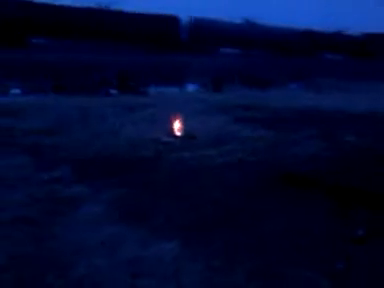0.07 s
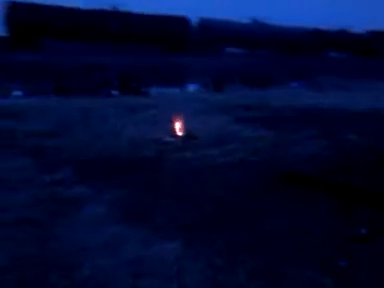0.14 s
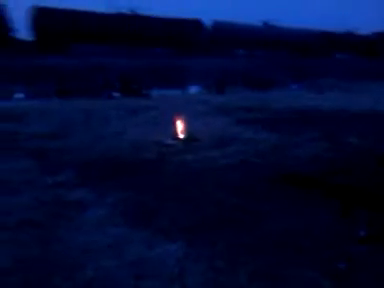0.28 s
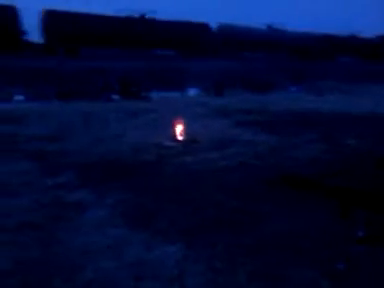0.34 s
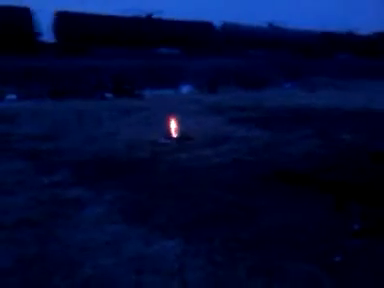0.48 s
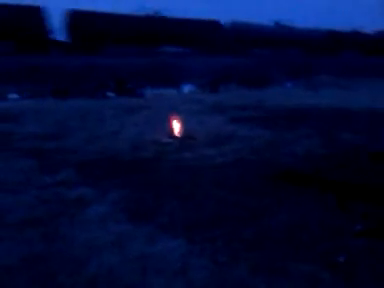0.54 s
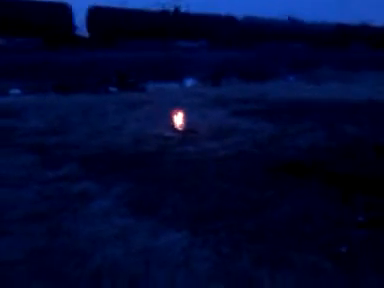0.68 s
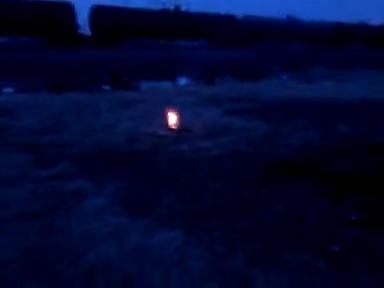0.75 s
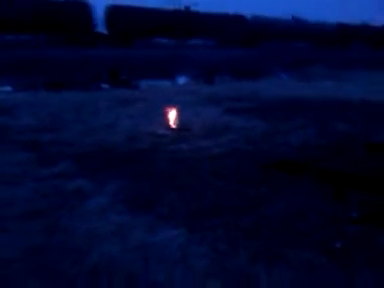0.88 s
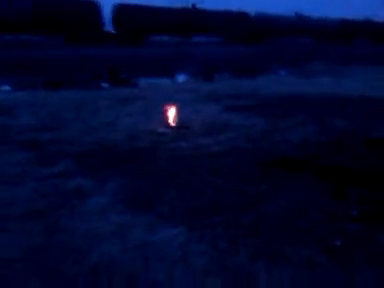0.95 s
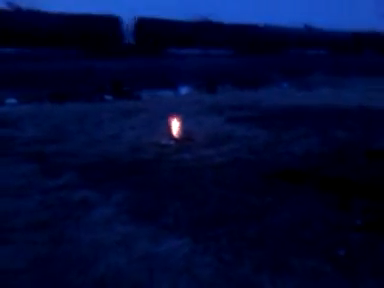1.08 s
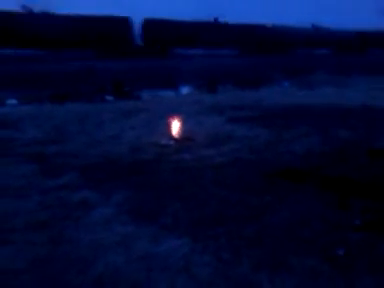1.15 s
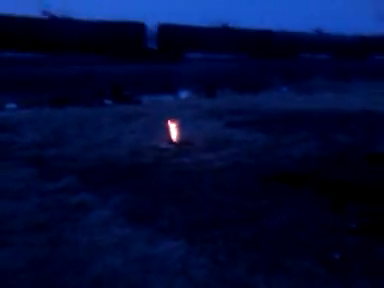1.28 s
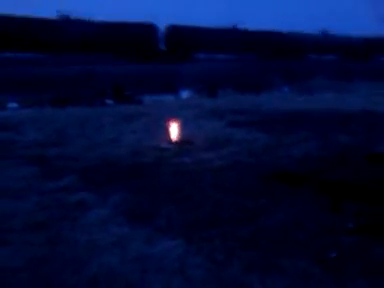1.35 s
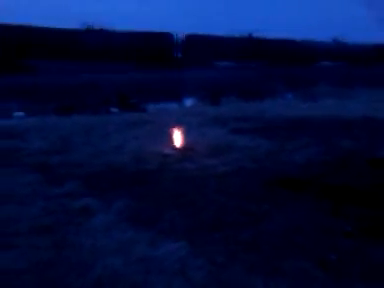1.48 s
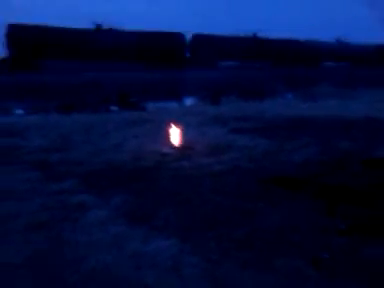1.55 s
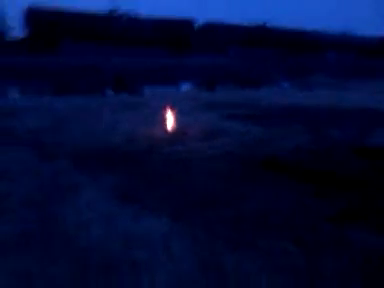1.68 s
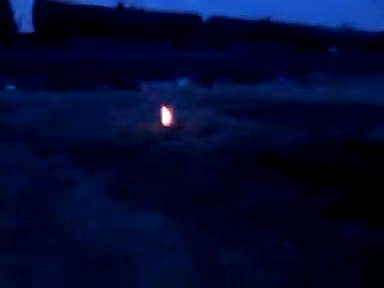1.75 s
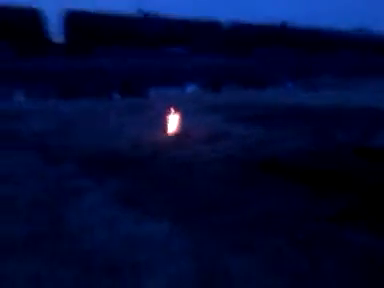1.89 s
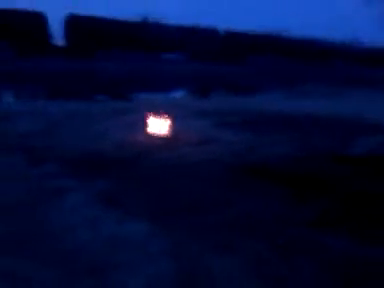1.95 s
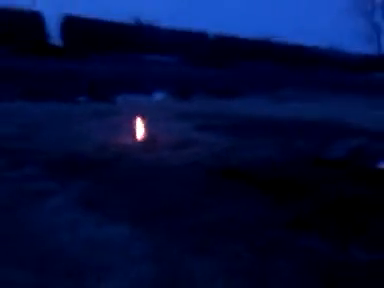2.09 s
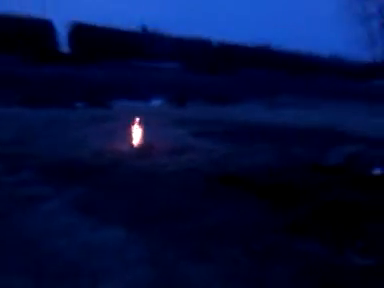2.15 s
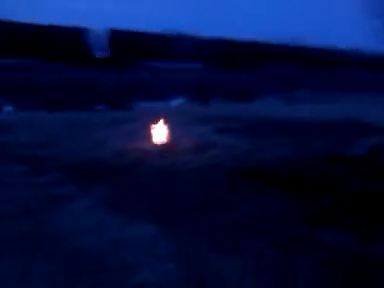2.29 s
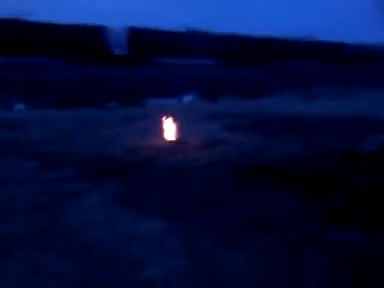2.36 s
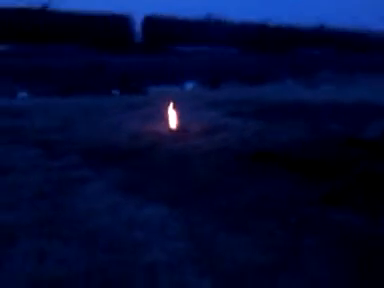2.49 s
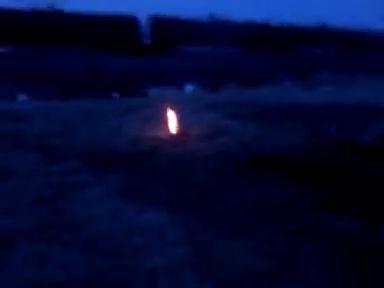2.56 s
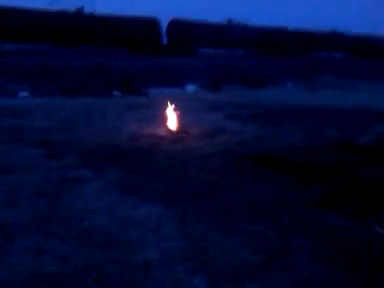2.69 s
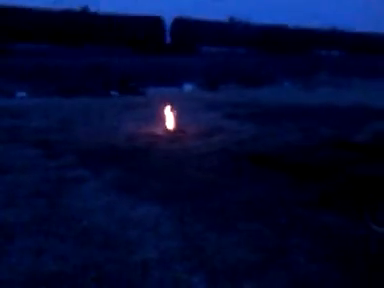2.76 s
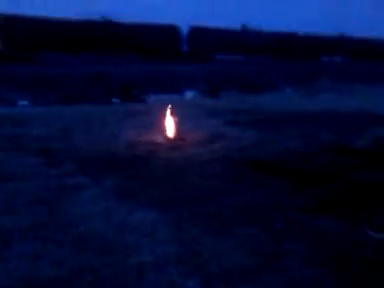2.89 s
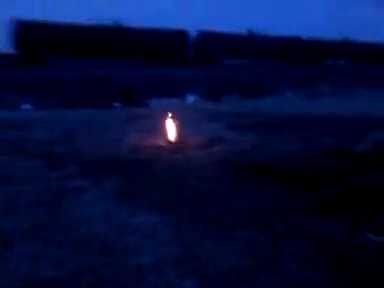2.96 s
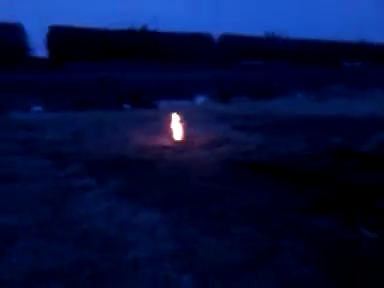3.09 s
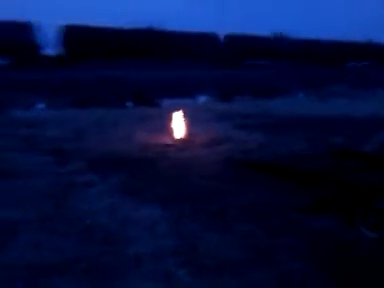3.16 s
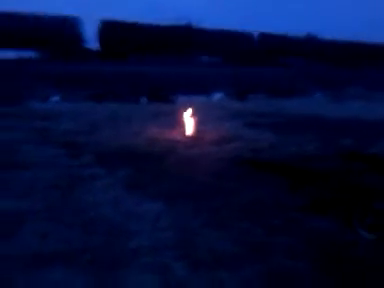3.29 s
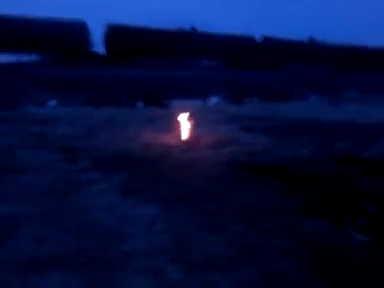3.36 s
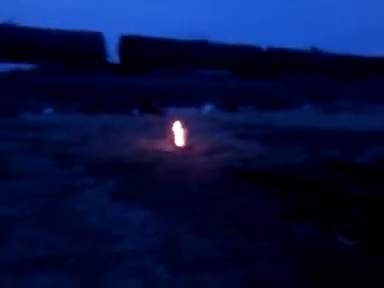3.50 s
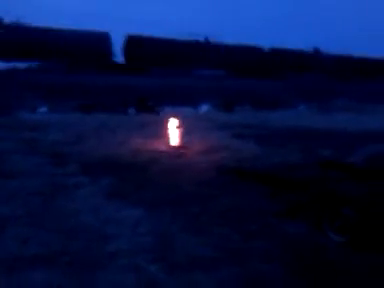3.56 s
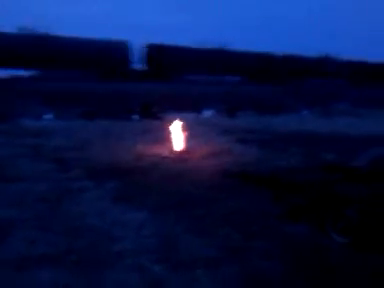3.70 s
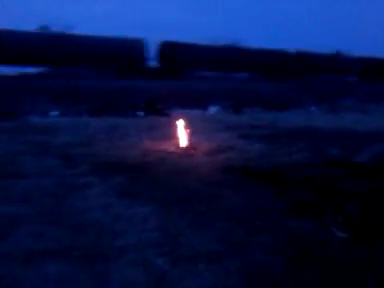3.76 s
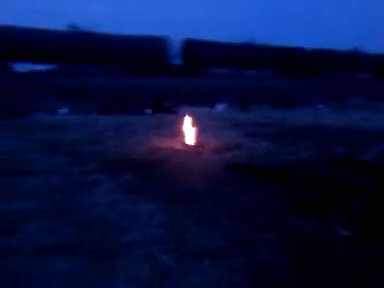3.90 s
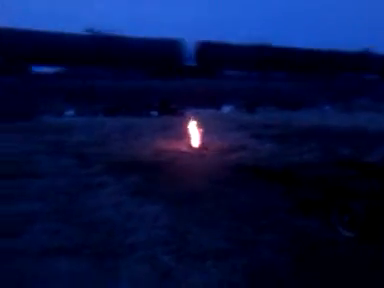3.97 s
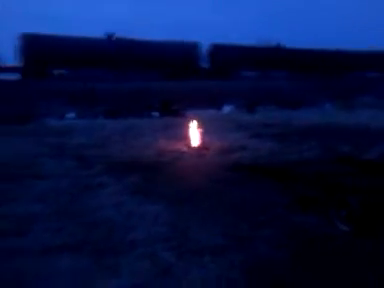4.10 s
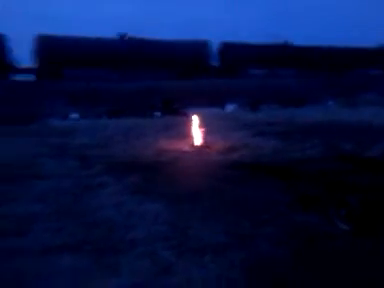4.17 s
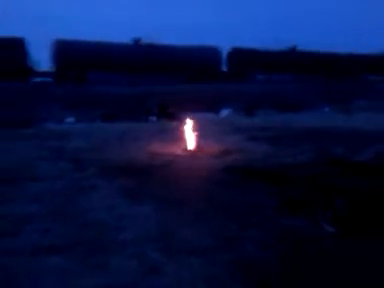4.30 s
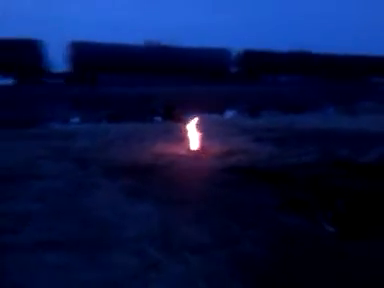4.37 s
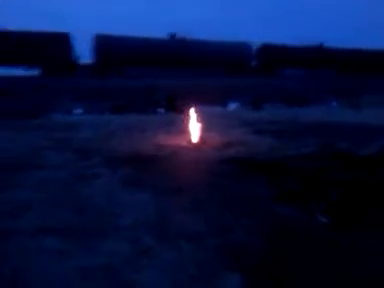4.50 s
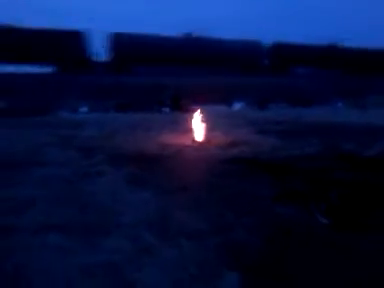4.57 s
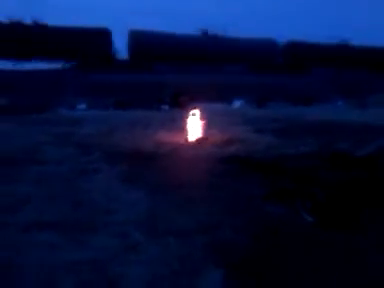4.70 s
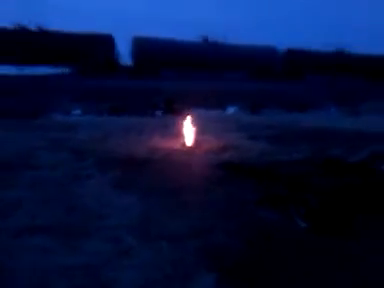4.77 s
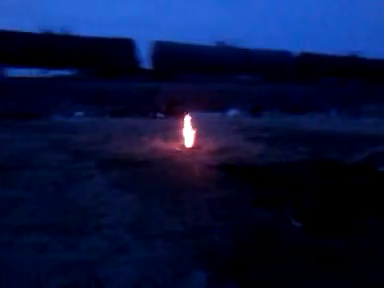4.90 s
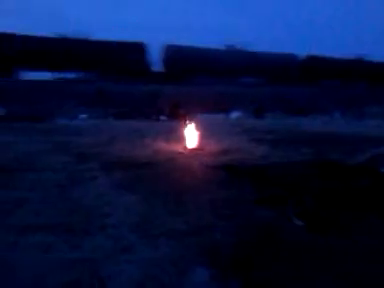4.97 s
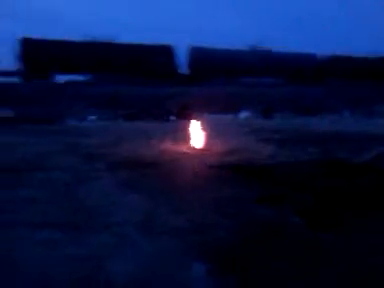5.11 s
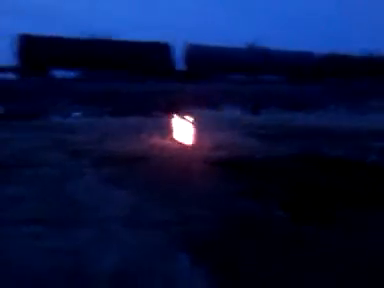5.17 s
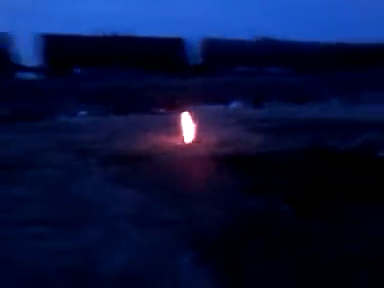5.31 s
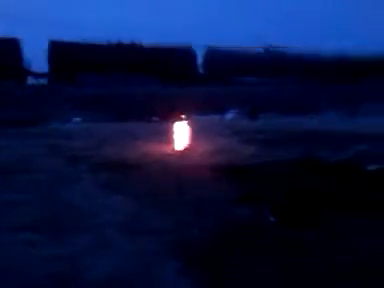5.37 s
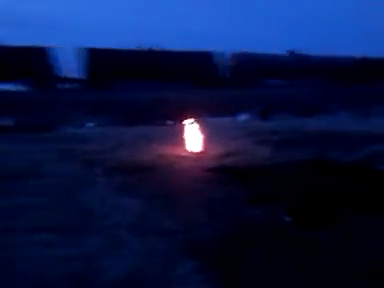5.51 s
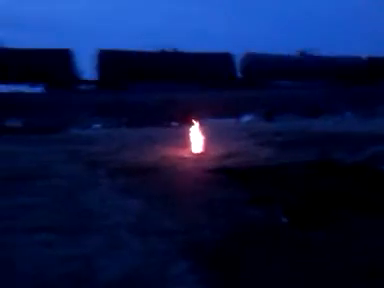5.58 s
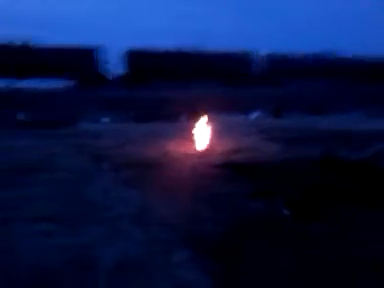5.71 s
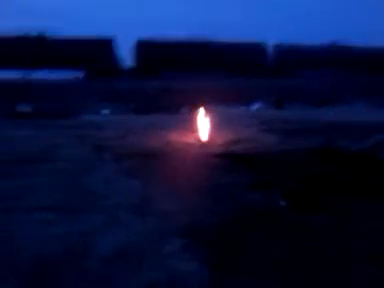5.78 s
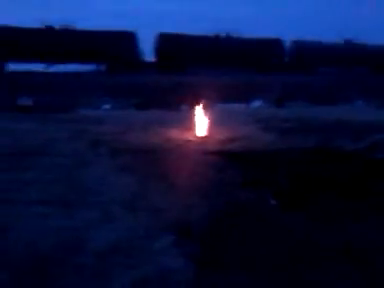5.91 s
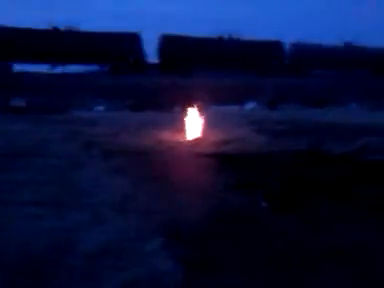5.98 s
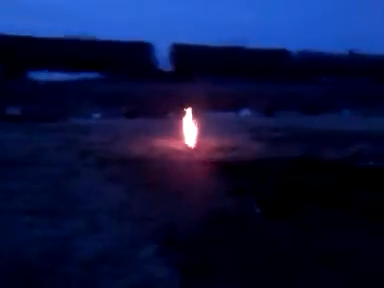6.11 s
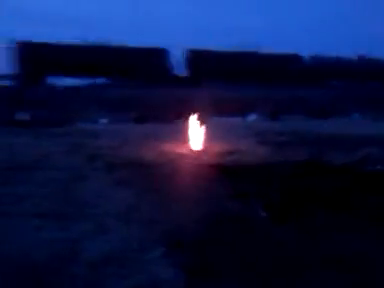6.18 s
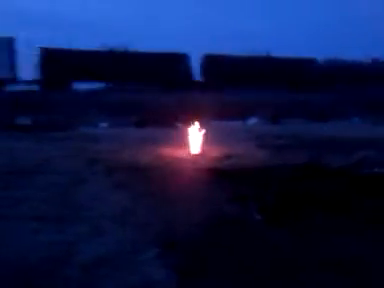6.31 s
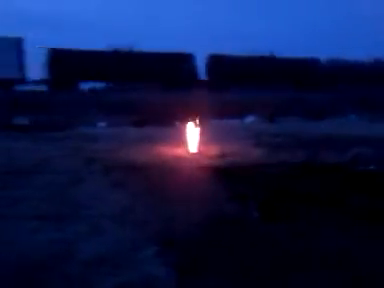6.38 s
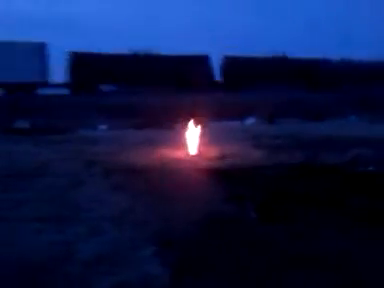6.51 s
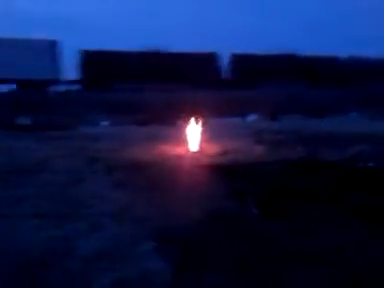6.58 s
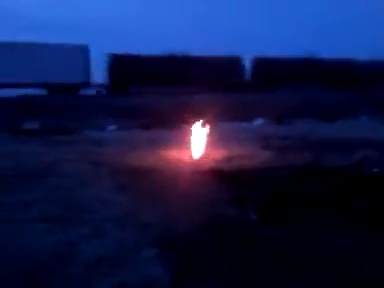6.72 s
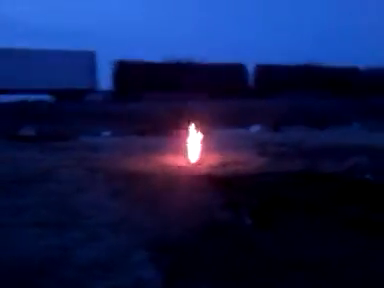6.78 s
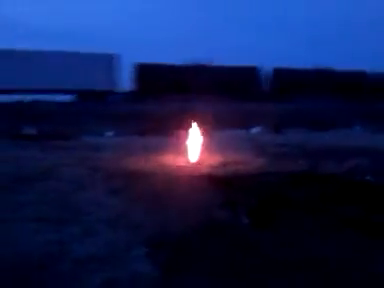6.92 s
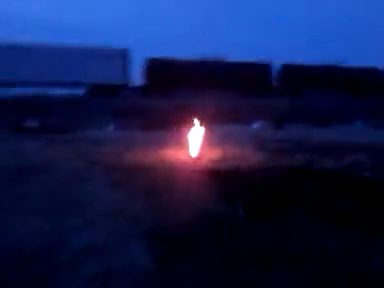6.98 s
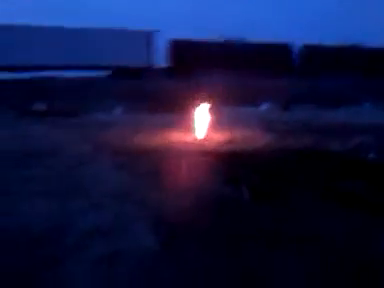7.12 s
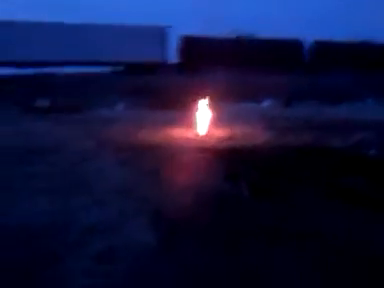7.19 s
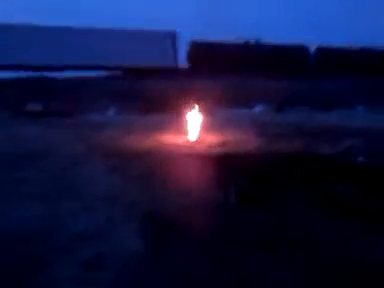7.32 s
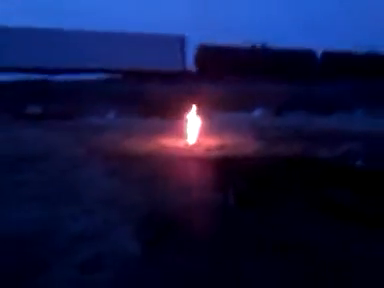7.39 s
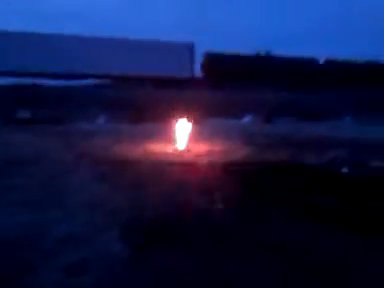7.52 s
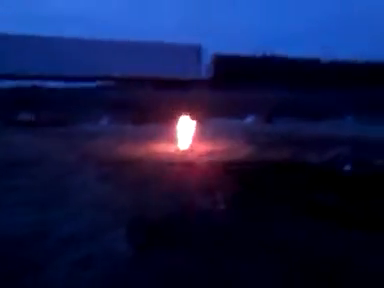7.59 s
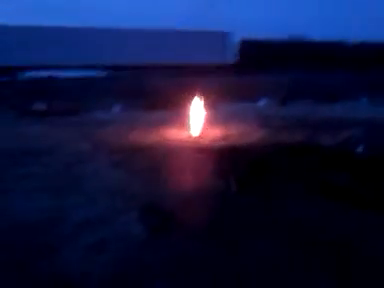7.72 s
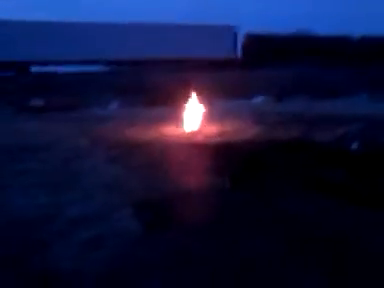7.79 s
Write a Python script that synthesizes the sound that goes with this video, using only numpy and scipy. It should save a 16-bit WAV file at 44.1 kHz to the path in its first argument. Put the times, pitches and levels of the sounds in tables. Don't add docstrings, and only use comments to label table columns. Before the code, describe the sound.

After a brief silence the sound opens abruptly on a freight train passing outdoors. Low car-body boom and a broad rolling roar run continuously, with a flat wheel banging about four times a second. The bangs blur into the distance as the rumble grows. Wheels sing in short metallic swells, a faint bearing whine joins later, and small overload clicks appear. A narrow-band phone microphone across a field makes it boxy.

```python
import sys
import numpy as np
from scipy import signal
from scipy.fft import rfft, irfft, next_fast_len
from scipy.io import wavfile
from scipy.ndimage import uniform_filter1d, minimum_filter1d, map_coordinates

SR = 44100
rng = np.random.default_rng(int(sys.argv[2]) if len(sys.argv) > 2 else 0)


def to_wav(sig):
    pcm = np.clip(np.atleast_2d(sig), -1, 1) * 32767
    pcm = np.round(pcm).astype(np.int16)
    wavfile.write(sys.argv[1], SR, pcm.T)


def volts(x):
    e = np.asarray(x, float) / 20
    return 10 ** e


N = 346185


def unit(x):
    return x / np.sqrt(np.mean(x ** 2) + 1e-20)


def along(points, hz):
    f, level_db = np.transpose(points)
    return volts(np.interp(np.log(hz + 1), np.log(f + 1), level_db))


def curves(rows):
    s, *columns = np.transpose(rows)
    return [np.interp(np.arange(N) / SR, s, column) for column in columns]


def swells(rows, half_s):
    t = np.arange(N) / SR
    return sum(np.outer(size, np.exp(-((t - s) / half_s) ** 2)) for s, *size in rows)


def wobble(rate):
    return map_coordinates(rng.standard_normal(N // 20), [np.arange(N) * rate / SR])


def filtered(x, response):
    m = next_fast_len(len(x) + 8192)
    return irfft(rfft(x, m) * response(np.fft.rfftfreq(m, 1 / SR)), m)[:len(x)]


def resonance(hz, width_hz):
    return lambda f: 1j * f * width_hz / (hz * hz - f * f + 1j * f * width_hz)


def narrow(hz, width_hz):
    drift = [unit(filtered(v, lambda f: 1 / (1 + (2 * f / width_hz) ** 2)))
             for v in rng.standard_normal((2, N))]
    phase = 2 * np.pi * np.cumsum(hz * np.ones(N)) / SR
    return unit(drift[0] * np.cos(phase) + drift[1] * np.sin(phase))


def rush(spectrum, patchy_db, grain_db, rate):
    contacts = rng.standard_normal(N) * volts(grain_db * np.minimum(wobble(rate), 2.3))
    z = signal.stft(contacts, nperseg=1024)[2]
    field = uniform_filter1d(rng.standard_normal(z.shape), 6, axis=0)
    field = uniform_filter1d(field, 4, axis=1)
    x = signal.istft(z * volts(patchy_db * unit(field)), nperseg=1024)[1][:N]
    return unit(filtered(x, lambda hz: along(spectrum, hz)))


# (t/s, rolling speed and nearness level/dB, axle load level/dB)
TRAIN = [(.6, -23, -25), (1.1, -22.5, -25), (1.6, -23.5, -26), (2.1, -22.5, -22.5), (2.6, -23.5, -27),
         (3, -21.5, -26), (3.5, -20, -23.5), (4.1, -20.5, -24), (4.7, -20, -23), (5.3, -18, -22),
         (5.7, -18.5, -19), (6.2, -17.5, -22), (6.55, -18, -25), (6.9, -18, -19), (7.2, -18, -19.5),
         (7.5, -21, -16), (7.85, -16.5, -18)]


def train():
    roll_db, load_db = curves(TRAIN)
    return roll_db, load_db


def follow(part, control_db):
    reference_db = -21
    return part[0] + part[1] * (control_db - reference_db)


# (f/Hz, level/dB per Hz)
BODY_SPECTRUM = [(15, -58), (25, -30), (74, -0.5), (91, 2.5), (130, -9), (170, -34), (290, -120)]
# (f/Hz, level/dB per Hz)
BOGIE_SPECTRUM = [(71, -29), (120, 0.5), (189, 0.5), (253, -7), (400, -12.5), (520, -39), (880, -120)]
# (t/s, car body swell level/dB, bogie swell level/dB)
LURCH = [(.93, 12, -2), (1.2, 6, 0), (1.35, -8, 5), (1.53, 3, 0), (1.78, -1, 7.5), (2.04, 9, 0),
         (2.36, 8.5, 3), (2.78, 6.5, -0.5), (3.15, 7, -0.5), (3.4, 2.5, 1), (3.62, 3.5, 1.5),
         (3.82, 6, -2.5), (3.92, -3, -3), (4.2, -12, 3), (4.75, 1.5, 2), (5.1, 4, -2), (5.3, -11, 0.5),
         (5.55, 6, 4), (5.65, -6.5, -5), (6.05, 2.5, 0), (6.16, -4, 3.5), (6.28, 9, 3.5), (6.37, -7.5, 4.5),
         (6.86, 8, 0.5), (7.1, 2, 1.5), (7.19, -6, -0.5), (7.32, 4, 5), (7.51, -3, 4.5), (7.64, -10, 1),
         (7.79, 3.5, 4.5)]
LURCH_S = .04
BODY_PART, BOGIE_PART = (-25, .9), (-24.5, 0.9)


def rumble():
    load_db = train()[1]
    body_swell_db, bogie_swell_db = swells(LURCH, LURCH_S)
    body_db = follow(BODY_PART, load_db) + body_swell_db + .8 * wobble(11)
    bogie_db = follow(BOGIE_PART, load_db) + bogie_swell_db + 0.7 * wobble(18)
    body = volts(body_db) * rush(BODY_SPECTRUM, patchy_db=0.5, grain_db=2.0, rate=100)
    bogie = volts(bogie_db) * rush(BOGIE_SPECTRUM, patchy_db=1.8, grain_db=1.5, rate=200)
    return body + bogie


# (f/Hz, level/dB per Hz)
RAIL_SPECTRUM = [(150, -21), (250, -8.5), (408, -3.5), (584, 1.5), (792, -3.5), (1100, -9.5), (1430, -31),
                 (2420, -120)]
# (f/Hz, level/dB per Hz)
SIDE_SPECTRUM = [(530, -29.5), (900, -3), (1270, 0), (1520, -1.5), (1800, -1.5), (2340, -17.5),
                 (3960, -120)]
# (f/Hz, level/dB per Hz)
WHEEL_SPECTRUM = [(940, -31.5), (1600, -4), (2060, -2.5), (2500, -1), (2920, -4), (3330, -6), (3600, -15),
                  (4680, -51), (7920, -120)]
# (f/Hz, level/dB per Hz)
EDGE_SPECTRUM = [(2060, -28), (3500, -0.5), (4120, -14), (4370, -24.5), (4570, -42.5), (5940, -69),
                 (10100, -120)]
RAIL_PART, SIDE_PART, WHEEL_PART = (-26.5, 0.7), (-28.5, 1.1), (-24, 0.51)


def rolling():
    roll_db = train()[0]
    jolt = wobble(9)
    wheel_base_db = follow(WHEEL_PART, roll_db)
    rail_db = follow(RAIL_PART, roll_db) + 0.46 * jolt + .9 * wobble(19)
    side_db = follow(SIDE_PART, roll_db) + 0.29 * jolt + 0.16 * wobble(12)
    wheel_db = wheel_base_db - 0.5 + 0.14 * jolt + 0.14 * wobble(18)
    edge_db = wheel_base_db - 17 + .6 * wobble(30)
    rail = volts(rail_db) * rush(RAIL_SPECTRUM, patchy_db=1.02, grain_db=1.0, rate=300)
    sides = volts(side_db) * rush(SIDE_SPECTRUM, patchy_db=1.5, grain_db=2.0, rate=300)
    wheels = volts(wheel_db) * rush(WHEEL_SPECTRUM, patchy_db=2.3, grain_db=1.5, rate=300)
    edge = volts(edge_db) * rush(EDGE_SPECTRUM, patchy_db=.8, grain_db=6.3, rate=650)
    return rail + shake() * (sides + wheels) + edge


BLUR_FROM_S, BLUR_S_PER_S, BLUR_MAX_S = 2.0, .05, 0.016


def smear(s):
    return np.clip((s - BLUR_FROM_S) * BLUR_S_PER_S / BLUR_MAX_S, 0, 1)


# (t/s, peak level/dB, ring f/Hz, thud level/dB)
FLAT = [(0.63, -12, 695, 4), (0.677, -11.5, 710, 5), (0.855, -6.5, 662, -14), (1.078, -8, 712, -10),
        (1.301, -5, 720, -6), (1.526, -6.5, 667, -2.5), (1.756, -4.5, 593, -6), (1.978, -9, 540, 2.5),
        (2.2, -9, 610, -4), (2.45, -7, 633, -16), (2.67, -7, 610, -15), (2.895, -9, 636, -9),
        (3.16, -10, 520, -8.5), (3.368, -19, 547, -4.5), (3.597, -19, 643, 3), (3.824, -8.5, 585, -9),
        (4.04, -9, 560, -8), (4.273, -9.5, 542, -10.5), (4.5, -10.5, 560, -12), (4.958, -18, 550, -8),
        (5.274, -10.5, 614, -14), (5.485, -11, 568, 2), (5.69, -7, 565, -9.5), (5.9, -9.5, 593, -7.5),
        (6.88, -11, 740, -7.5), (6.99, -6.5, 684, -10), (7.246, -11.5, 452, -7), (7.794, -9, 525, -3.5)]
BANG_T60_S, CLANK_DB = .2, -9
SMEAR_T60_S, SMEAR_DB = 0.047, 3
RING_WIDTH_HZ, SMEARED_WIDTH_HZ = 410, 300


def flat_spot():
    out, t = np.zeros(N + SR), np.arange(SR // 2) / SR
    thud_mode, clank_mode = resonance(170, 150), resonance(1500, 1200)
    for s, db, hz, thud_db in FLAT:
        noise = rng.standard_normal((3, len(t)))
        far = smear(s)
        rise = 1 - np.exp(-t / (.002 + far * BLUR_MAX_S))
        rail_mode = resonance(hz, RING_WIDTH_HZ + far * (SMEARED_WIDTH_HZ - RING_WIDTH_HZ))
        blow = 1.9 * (1 - far) * np.sin(2 * np.pi * hz * t) * volts(-60 * t / 0.049)
        rail = unit(filtered(noise[0], lambda f: rail_mode(f) ** 2))
        rail = rail * volts(-60 * t / (BANG_T60_S + SMEAR_T60_S * far))
        thud = unit(filtered(noise[1], lambda f: thud_mode(f) ** 2))
        thud = thud * volts(thud_db - 2.0 - 60 * t / 0.16)
        clank = unit(filtered(noise[2], lambda f: clank_mode(f) ** 2))
        clank = clank * volts(CLANK_DB - 14.5 - 6 * far - 60 * t / .12)
        bang = blow + rise * (rail + thud + clank)
        out[round(s * SR):][:len(t)] += volts(db - 9.5 + far * SMEAR_DB) * bang
    return out[:N]


SHAKE_DB, SHAKE_S = -1.5, 0.078


def shake():
    blows = np.zeros(N)
    for s, db, *_ in FLAT:
        blows[round(s * SR)] = volts(db + SHAKE_DB) * (1 - 0.46 * smear(s))
    return 1 + filtered(blows, lambda f: SR / (1 / SHAKE_S + 2j * np.pi * f))


# (t/s, swell level/dB, shift f/Hz)
SING = [(.76, 4, -100), (1.16, 5, 70), (1.58, 10, 80), (1.8, 2.5, 20), (2.25, 1.5, -20), (2.6, 2.5, -50),
        (2.86, 4, -60), (3.3, 0, 60), (3.9, 3, 15), (4.51, 3, -40), (5.0, 0.5, -30), (5.39, 5, 70),
        (5.62, 1.5, 60), (5.97, 2, 90), (6.13, -2, -60), (6.41, 3, -30.5), (6.67, 6.5, -30),
        (6.83, 5, -180), (6.95, 3, -180), (7.07, 1.5, -29.5), (7.3, 2, -39.5), (7.52, 4.5, 29.5),
        (7.7, 4.5, 70)]
SING_S = .05
RING_PART, RIM_PART = (-26, 1.8), (-40, .3)
RING_HZ, RING_DRIFT_HZ = 2399, 44.95


def discs():
    roll_db = train()[0]
    swell_db, shift_hz = swells(SING, SING_S)
    hz = RING_HZ + shift_hz + RING_DRIFT_HZ * wobble(4)
    ring_db = follow(RING_PART, roll_db) + swell_db - 2.5 + 2.2 * wobble(10)
    rim_db = follow(RIM_PART, roll_db) + 2.5 * wobble(12)
    ring = volts(ring_db) * narrow(hz + 60 * wobble(25), width_hz=540)
    return ring + volts(rim_db) * narrow(3310, width_hz=130)


# (nearest t/s, half length t/s, level/dB)
WHINE_PASS = [
    (7.05, .7, -32),
    (6.2, .55, -39),
]
WHINE_HZ, WHINE_FAR_DB = 1927, -44.5


def bearing():
    t = np.arange(N) / SR
    near = np.clip(t - 4, 0, 1)
    third, second = [volts(WHINE_FAR_DB) + volts(db) * np.exp(-((t - s) / half_s) ** 4)
                     for s, half_s, db in WHINE_PASS]
    third = third * volts(3 * wobble(9)) * narrow(WHINE_HZ + 8 * wobble(3), width_hz=60)
    second = second * narrow(WHINE_HZ * 2 / 3, width_hz=40)
    return near * (third + second)


# (f/Hz, level/dB)
TREBLE_CUT = [(3300, 0), (3700, -8), (4100, -24), (4600, -60), (9000, -120)]


def scene():
    steel = filtered(discs() + flat_spot(), lambda hz: along(TREBLE_CUT, hz))
    return (rumble() + rolling() + steel + bearing())[None]


# (t/s, gain level/dB)
START = [
    (.571, -120),
    (.572, -50),
    (.574, -16),
    (.578, -20),
    (.5795, 2.5),
    (.585, 0.5),
]


def late_start(x):
    return x * volts(curves(START)[0])


# (t/s, splatter level/dB)
CREST = [(4.888, -27), (5.4924, -33.5), (5.6008, -34.5), (6.115, -34.5), (6.2387, -29.5), (6.297, -33.5),
         (6.69, -43.5), (7.04, -47), (7.0605, -25.5), (7.1167, -44.5), (7.3375, -31), (7.346, -32),
         (7.3591, -26), (7.4759, -36.5), (7.5229, -43), (7.7455, -30), (7.7874, -59.5)]
# (t/s, splatter level/dB)
AFTER = [
    (6.1192, -55),
    (6.2418, -56.5),
    (7.7496, -52),
]
TOP = .7


def ticks(x):
    t = np.arange(-200, 201) / SR
    push = 0.63 * np.exp(-(t / 0.00049) ** 2)
    ping = np.cos(2 * np.pi * 2400 * t) * np.exp(-(t / 0.0011) ** 2)
    tick = (push + ping) / (1 + push.max())
    out = np.zeros(N)
    for s, db in CREST + AFTER:
        at = round(s * SR) + 35
        at += np.argmax(np.abs(x[at:at + 50]))
        out[at - 200:at + 201] += tick * (np.sign(x[at]) * (TOP + volts(db + 6.0)) - x[at])
    return out


# (t/s, peak level/dB, f/Hz)
FAINT = [(4.8944, -48, 4710), (5.4974, -57, 4700), (6.1264, -71.5, 4880), (6.2981, -33, 4800),
         (6.3175, -65, 4700), (6.6944, -44.5, 4800), (7.0684, -47.5, 4700), (7.0774, -69, 4710),
         (7.1157, -55, 4700), (7.1234, -66.5, 4720), (7.3704, -65.5, 4700), (7.4874, -70, 4700),
         (7.5324, -64, 4700)]


def blips():
    out, t = np.zeros(N), np.arange(-200, 201) / SR
    for s, db, hz in FAINT:
        speck = np.cos(2 * np.pi * hz * t) * np.exp(-(t / .0005) ** 2)
        out[round(s * SR) - 140:][:len(t)] += volts(db) * speck
    return out


def peak_control(x):
    need = np.minimum(1, .63 / (np.abs(x) + 1e-9))
    return x * uniform_filter1d(minimum_filter1d(need, size=161), size=81)


def top_cut(x):
    return signal.sosfilt(signal.butter(12, 15870, fs=SR, output="sos"), x)


def record(dry):
    x = filtered(dry[0], lambda hz: 1 / (1 + (46 / (hz + 1)) ** 3.6))
    x = late_start(peak_control(x))
    x = filtered(x, lambda hz: 1 / (1 + (hz / 4600) ** 40))
    x = x * (np.arange(N) > .57 * SR)
    x = np.clip(x + ticks(x), -TOP, TOP) + blips()
    return top_cut(x[None])


dry = scene()
out = record(dry)
to_wav(out)
```